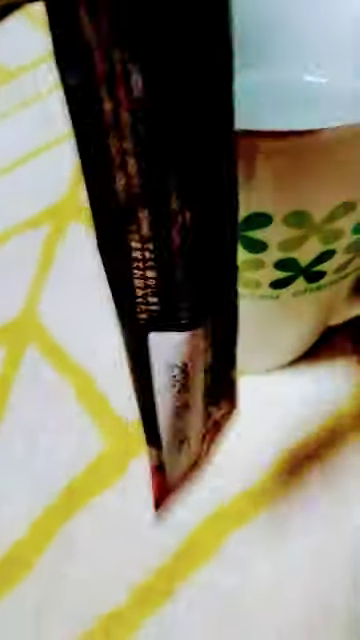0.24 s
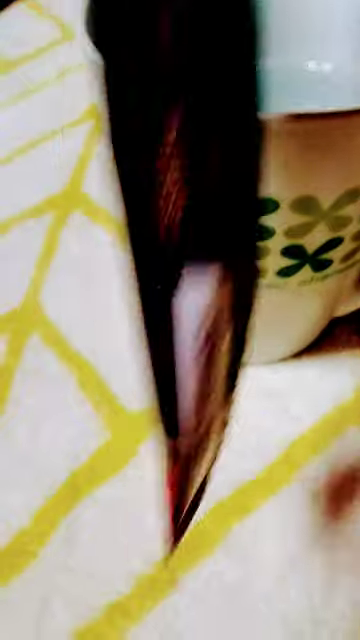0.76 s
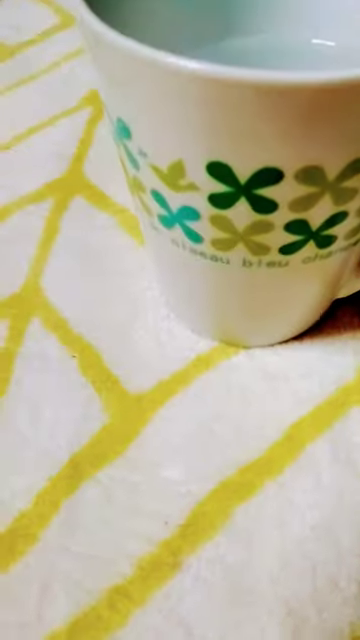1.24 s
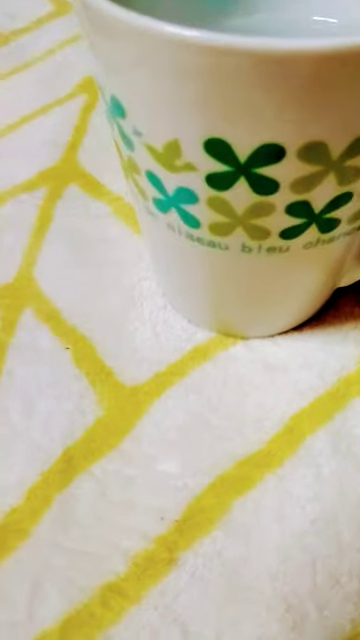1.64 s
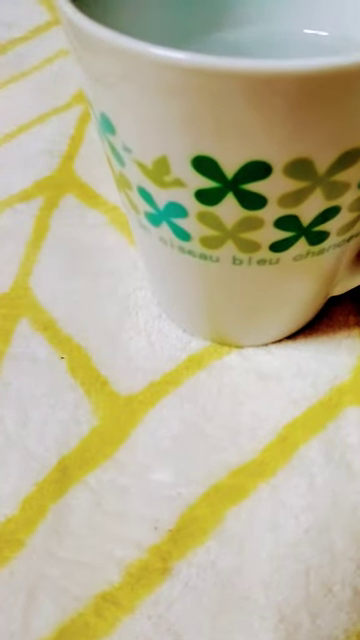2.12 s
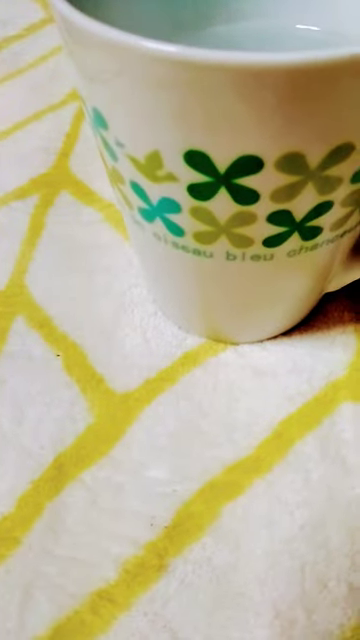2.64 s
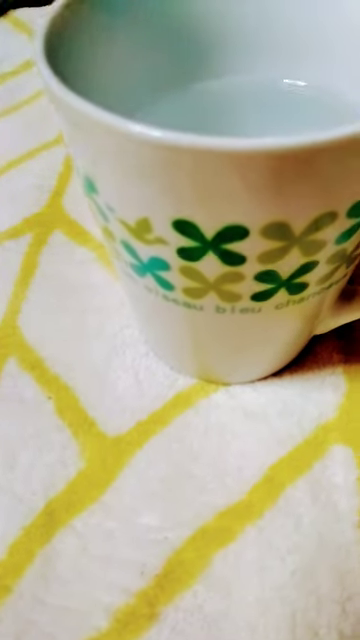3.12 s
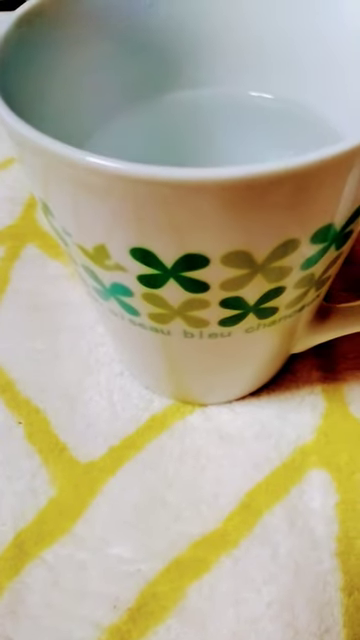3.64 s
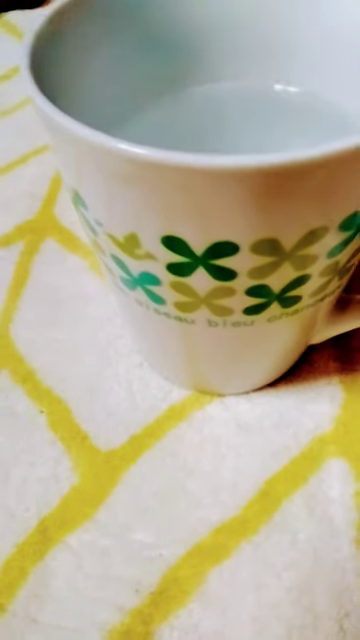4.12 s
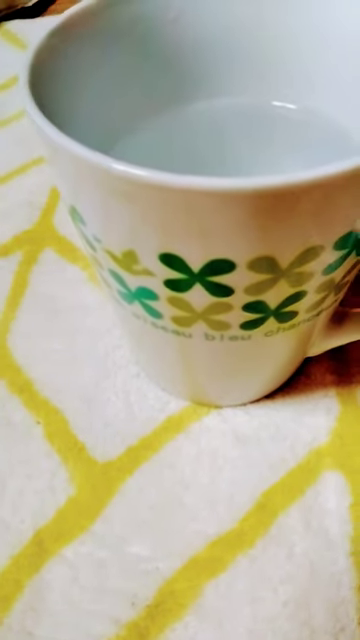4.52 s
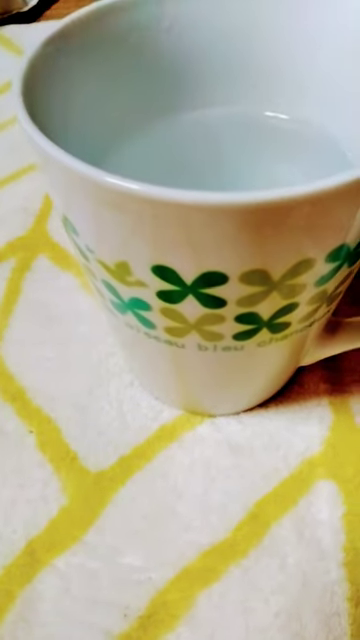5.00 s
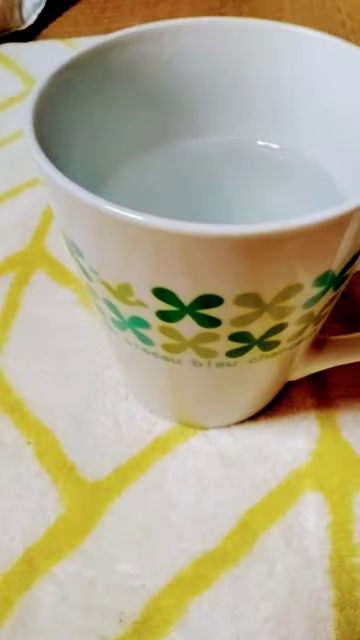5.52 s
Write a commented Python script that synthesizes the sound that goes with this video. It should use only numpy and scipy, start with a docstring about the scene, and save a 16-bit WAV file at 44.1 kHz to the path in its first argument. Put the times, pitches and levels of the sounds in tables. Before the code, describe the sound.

A small foil sachet is crinkled between fingers very close up, with sharp bright snaps, dry rustling and tearing bursts in a quiet room.

```python
"""Foil sachet crinkled and torn

Fingers crinkle and tear a small foil sachet close to two hand-held microphones in a quiet room.
Creases snap as shaped noise bursts with a ringing facet; rustle is a dense train of tiny slips over a rub.
Soft low pushes of air and hand are decaying sines; room hum and hiss are shaped noise.
The foil gets close echoes and a short tail, then a colour per microphone; the right one hears it later."""
import sys
import numpy as np
from scipy import signal
from scipy.fft import rfft, irfft
from scipy.io import wavfile
from scipy.ndimage import uniform_filter1d, map_coordinates

SR = 44100
rng = np.random.default_rng(int(sys.argv[2]) if len(sys.argv) > 2 else 0)


def generate_wav(sig):
    """Save sig (samples, or channels by samples) to the path in sys.argv[1] as 16-bit PCM at SR."""
    pcm = np.round(np.clip(np.atleast_2d(sig).T, -1, 1) * 32767).astype(np.int16)
    wavfile.write(sys.argv[1], SR, pcm)


N = 253839

# loudest buckling creases: start_s [s], treble_db [dB, energy at the foil], mid_over_treble_db [dB],
# ring_hz [Hz], bass_over_treble_db [dB], left_over_right_db [dB]
CREASES = [(0.068, -36.5, 18.5, 1340, 32, -4), (0.0914, -14, 5, 3770, 3, -1.5),
           (0.1515, 2.2, 1, 3260, 5, 0.5), (0.1833, -23.5, 19.5, 3430, 15, 8),
           (0.2095, -23, -15, 2410, -14, 9), (0.2558, -19, 12.5, 3400, 24.5, 1.5),
           (0.3183, -15, 12, 3240, 5.5, -1), (0.4328, -22.5, 0, 2410, 16, 1),
           (0.469, 6.5, -4, 4180, 0.5, -3.5), (0.4924, -38, 20, 1760, 20, 17),
           (0.5145, -4, 2, 4360, -5.7, -4), (0.528, -20.5, 15, 3160, 24.5, 8.5),
           (0.54, -12, 9.5, 5960, -10, 2), (0.605, -12.5, -1, 3940, -6, -1),
           (0.6265, 7.5, -4, 4360, -1, -3.5), (0.6992, -11.5, 2, 2680, -5, 1),
           (0.7043, -1.5, 3, 2830, -30, 5.5), (0.7488, -11.5, 12.5, 4330, -12, -4.5),
           (0.7994, -17.5, -1, 4200, -20, -6), (0.8467, -25, 7.5, 1340, 10, -1),
           (0.869, -16.5, 1, 1200, 13.5, -2), (0.9079, -13, -1.5, 1930, 14, -7.5),
           (0.918, -27.5, 13.5, 1220, 29, 0.5), (0.9733, 6.2, -5, 5560, 2, -7),
           (1.009, -31, 13, 1110, 31, -9), (1.026, -37, 26, 2160, 31, 9), (1.0382, -30.5, 26, 1960, 34, -4),
           (1.0824, -1.3, 6, 2430, -3, 1), (1.135, 8, -5, 2710, -1, 3), (1.168, -21.4, 5, 1770, -6, -3),
           (1.1953, -20.5, 9, 1600, 5, 3), (1.213, -37, 21, 1850, 20, -6), (1.3204, 9, 0, 2470, -9, 0),
           (1.4198, -12.5, -2.5, 5770, 0, -5), (1.45, -16.5, 6, 3640, 2, -2),
           (1.5037, -27.5, 13.5, 1230, 30, -9), (1.51, -36.5, 22, 1360, 28, -1),
           (1.5396, -16.5, 4.5, 3500, -13, -9), (1.554, -22, 11, 1460, 8, -7),
           (1.5856, 8.5, -4.2, 1530, 1.5, -4.5), (1.6, -8, 3, 6000, 12.5, -6),
           (1.6296, -8.5, -2, 4300, -4, 7), (1.638, 1.5, 0, 2400, 2.5, -6.5), (1.642, 4, -10, 2280, -8, 11),
           (1.7464, -34, 12, 1340, 23, -8), (1.7579, -20, 11.5, 2060, 8, -17.5),
           (1.795, -29, 15, 1960, 20, -19), (1.811, -8, 1, 5150, 2, -5.5),
           (1.8501, -16.5, 4, 2120, 22, -14), (1.8893, -38.5, 20.5, 1540, 21, -11),
           (1.9024, -18.5, -11, 4780, -10, -11), (1.917, -25, -13, 1720, -5, -13),
           (1.9952, -18.5, 7, 4940, 4, -11), (2.0774, -30, -11, 4610, 1, -6),
           (2.1752, -32.5, 17.5, 1250, 42.5, -11.5), (2.2568, -30.5, 9, 1630, 0, -10),
           (2.269, -17, 3.5, 1510, 15, -9), (2.2805, -23.5, 9, 1660, 10, -14),
           (2.318, -19, -36, 5430, -18.9, -17), (2.324, -25, -25, 1450, 0, -15),
           (2.355, -30.5, 4, 2100, 10, -21), (2.3766, -27, -8, 5810, 0, -22),
           (2.4001, -23.5, -24, 5770, -14, -13), (2.4341, -24.5, 0.5, 1300, 18, -1),
           (2.46, -1, -7, 5200, -19, -13), (2.4918, 5.5, -3, 1570, 0, -4), (2.542, -17, 11, 2000, 15, -7),
           (2.5867, -27, -14, 1340, 11, -17), (2.6503, -9.5, 5, 2180, 2.5, -18),
           (2.694, -30.5, 22.5, 2180, 29, -12.5), (2.7193, -31, 14, 1300, 25, -2),
           (2.734, -16.5, -3, 4870, -14, -13), (2.8081, -11.5, 3, 4650, -14, -2.5),
           (2.862, -19, -28, 3230, -20, -18), (2.9658, -16.5, -23, 5400, -15, -16),
           (2.9807, -16, -4.5, 5730, -17, -8), (3.0058, -30.5, -2, 2180, 3, -15),
           (3.066, -25.5, 4, 1600, -6, 8), (3.1462, -36.8, -6, 5030, -4, -7),
           (3.1958, -32, 7.5, 2790, 2, -6), (3.2345, -29.5, -8, 1116, -8, -14),
           (3.2776, -44.5, 16.5, 1250, 16, -3), (3.349, -31, 7, 5210, 18, -19),
           (3.3574, -26, -2, 5800, -11, -7), (3.387, -15, -6.5, 3670, -21, -10),
           (3.3998, -14.5, -11, 5560, -17, -15), (3.4163, -18, 1, 5150, 1, -12.5),
           (3.461, -19.5, -6, 5990, -15, -18), (3.4677, -27, -8, 5990, -13, -15),
           (3.4791, -13, -4.5, 5460, -11, -3), (3.4878, -14, -15, 4090, -14.3, -13),
           (3.541, -31.5, -5, 3960, 2, -15), (3.582, -24, -34, 4650, -16, -13),
           (3.6058, -32, 23, 2520, 0, -12), (3.7924, -27, -18, 5770, -6, -15),
           (3.812, -16, -8, 1290, -20, -8), (3.82, -32, 17.5, 1930, 19, -21),
           (3.858, -11, 9, 2300, -6, -17), (3.9335, -0.5, -9.5, 5540, 4.5, -14.5),
           (3.9436, -7, -42, 5800, -20, -24), (3.954, -16.5, 14, 1770, 11.5, -11.5),
           (4.025, -24, -20, 5990, -2, -9), (4.2471, -34, 24, 2040, 32, -12.5),
           (4.257, -26.5, 12.5, 1510, 22.5, -17), (4.2757, -32, 16, 2060, 18, -15),
           (4.402, -12.5, -31, 5550, -5, -8), (4.4175, -6.5, -40, 4500, 1, -19.5),
           (4.7224, -36.5, 24.5, 1820, -2, -3), (4.7697, -22.5, 16, 1720, 15, -3),
           (4.784, -27, 24.5, 1730, 22, -2), (4.8411, -6, 8, 2570, 14.5, -3), (4.8814, -6, 3, 5930, 3, -5),
           (4.9251, 2.5, -5, 3960, -14, -6.5), (4.9466, -7.5, 6, 1300, 8, -5),
           (4.9729, 5.5, 1, 4330, -5, -2), (4.9921, -5, 4.5, 5730, -4, -2), (5.0062, -2, 3, 5700, 10.5, 14),
           (5.015, -6.5, -3.5, 2150, -10, -14), (5.053, -16.5, 5, 4800, -22, 4),
           (5.1022, -21, -6, 4770, -16, -11), (5.1607, -35, -12, 1210, 31, -13),
           (5.1972, -4, 2, 3220, -15, -4), (5.2183, -6, 7.5, 5000, -1, 3), (5.2269, 10, -10, 4870, -3.5, 0),
           (5.25, -15, -14, 1290, 8, 14), (5.294, -15.5, 13.5, 2730, 14.5, 1),
           (5.383, -6, -20, 5170, -2, 1), (5.4267, -10.5, 1.5, 1630, 20, 13),
           (5.4317, -13, 14, 3700, -12, -1), (5.4745, -8.5, -9, 2310, -22, -20),
           (5.511, -30, 1, 1160, 20, 12), (5.5293, -20, 3.5, 1110, 20.5, 18.5),
           (5.5426, -18, 8, 3790, -6, -15), (5.5664, 4.5, 1.5, 4300, 2.5, 8.5),
           (5.6971, -4, -39, 5940, -5, -17)]
SNAP_SCALE_MS, SNAP_SPREAD_DB = 1.033, 1.36
# dB of length per dB: stronger snaps are quicker, those heavy in mid are longer
LENGTH_PER_TREBLE_DB, LENGTH_PER_MID_DB = -0.09, 0.125


def snaps(rows):
    """Each crease gives a quick burst and a weaker flutter; the facet beside it rings; lower sound lasts longer."""
    start_s, treble_db, mid_db, ring_hz, bass_db, pan_db = np.transpose(rows)[..., None]
    length_db = LENGTH_PER_TREBLE_DB * treble_db + LENGTH_PER_MID_DB * mid_db
    length_db = length_db + SNAP_SPREAD_DB * rng.standard_normal(start_s.shape)
    scale_ms = SNAP_SCALE_MS * gain_of(length_db)
    size, lead = 1024, 256  # samples
    t_ms = (np.arange(size) - lead) * 1000 / SR

    hz = np.fft.rfftfreq(size, 1 / SR)
    half_width_hz = .13 * ring_hz
    resonance = 1 / (1 + 1j * (hz - ring_hz) / half_width_hz)
    ring = 0.65 / (1 + (hz / ring_hz / 2.2) ** 2) + resonance

    noise = two_views((len(start_s), size), 0.73)
    shove = 0.24 * np.sign(noise[0, :, :1])  # the facet also jumps as a whole, in or out
    burst = 0
    for k, (over_db, stretch) in enumerate(zip((0, mid_db, bass_db), (.3, .35, .6))):
        age = np.maximum(t_ms, 0) / (stretch * np.maximum(scale_ms, .2))
        quick = age ** 2 * np.exp(-2.2 * age)
        flutter = 0.19 * np.minimum(age, 1) * np.exp(-.3 * age)
        band = bands((noise + shove * k / 2) * (quick + flutter), ring)[k]
        burst = burst + band * gain_of(treble_db + over_db) / np.sqrt(size)
    burst = patchy(burst, 2.6) * panned(pan_db)

    out = np.zeros((2, N))
    for k in range(len(start_s)):
        add(out, start_s[k, 0] - lead / SR, burst[:, k])
    return out


TICKS_PER_S = 16
TICK_OVER_RUSTLE_DB, TICK_SPREAD_DB = 18, 3
TICK_MID_DB, TICK_BASS_DB, TICK_COLOUR_SPREAD_DB = 0, 8, 6.5


def ticks(level_db):
    """Small creases at random moments, as strong as the rustle around them allows; rows as in CREASES."""
    when, pitch = rng.random((round(TICKS_PER_S * N / SR), 2)).T
    size, mid, bass, side = rng.standard_normal((len(when), 4)).T
    at = np.int_(when * (N - 1))
    treble_db = level_db[at] + TICK_OVER_RUSTLE_DB + TICK_SPREAD_DB * size
    mid_db = TICK_MID_DB + TICK_COLOUR_SPREAD_DB * mid
    bass_db = TICK_BASS_DB + TICK_COLOUR_SPREAD_DB * bass
    ring_hz = 1100 * 5.5 ** pitch
    pan_db = along(PLACE)[at] + 4 * side
    return np.transpose([at / SR, treble_db, mid_db, ring_hz, bass_db, pan_db])


# grip and work of the fingers: time_s [s], treble_db [dB]
GRIP = [(0, -51), (0.09, -66), (0.3, -102), (0.5, -80), (0.56, -51), (0.79, -61), (0.82, -82), (0.95, -74),
        (1.05, -66), (1.2, -56), (1.28, -62), (1.39, -47), (1.65, -50.5), (1.95, -61.5), (2.1, -78),
        (2.29, -57), (2.69, -54.5), (2.98, -59.5), (3.07, -70.5), (3.26, -82), (3.42, -59), (3.56, -69.5),
        (3.69, -60.5), (3.73, -55), (3.9, -61.5), (4.0, -59), (4.125, -57.5), (4.15, -74.5), (4.34, -58),
        (4.63, -54.5), (4.9, -54), (5.09, -53.5), (5.21, -46), (5.25, -43.5), (5.45, -39), (5.5, -59),
        (5.76, -67)]
# where the sachet is held: time_s [s], left_over_right_db [dB]
PLACE = [(0, -2), (1.3, 0), (1.9, -6.5), (2.5, -5.5), (3.1, -7), (4.1, -12.5), (4.5, -2.5), (5.2, -2),
         (5.45, -3.5), (5.6, -6), (5.76, -11)]
# short slides of a finger or of the tear: loudest_s [s], treble_db [dB], length_s [s],
# pan_off_place_db [dB, left over right], dull_db [dB, added to mid and bass over treble]
STROKES = [(0.008, -40, 0.022, -7, 14.5), (0.039, -40.5, 0.034, 1, 4), (0.18, -44.5, .08, -12, 6.5),
           (0.425, -52, 0.14, -3, -3), (0.571, -44, 0.15, 0, -4.5), (0.653, -54, 0.067, -5, -9),
           (0.891, -42, .11, -1, 0), (1.006, -45.5, 0.089, -6, 13), (1.166, -49.5, 0.18, -4, 11),
           (1.234, -33.5, 0.042, 4, 0.5), (1.347, -45.5, 0.16, -12, 5.5), (2.008, -53.5, 0.15, -4, -1),
           (2.431, -40.5, .12, -1, -6), (2.525, -51, 0.09, 17, 9), (2.735, -41, 0.11, 0, 2.5),
           (2.797, -43, 0.13, -0.5, 7.5), (2.907, -50, 0.044, -6, -10), (3.806, -40, 0.04, -2, -6),
           (3.85, -42, 0.031, 6, -7), (3.947, -26.5, 0.042, 13, 3.5), (4.264, -49.5, 0.2, 0, 1.5),
           (4.391, -40.5, 0.16, -0.5, -2), (4.479, -42, 0.43, -0.5, 0.5), (4.93, -47, .05, 6, -26),
           (5.037, -49, 0.24, -20, -3), (5.426, -36.5, 0.1, 3, 11), (5.54, -41.5, 0.077, 6, 13),
           (5.568, -25, 0.11, -7, -0.5), (5.64, -30.5, 0.062, 1.5, 4), (5.7, -29.5, 0.027, 2, 0)]
STROKE_RISE_SHARE, STROKE_END_DB, STROKE_ROUND = 0.51, -30.5, 1.29  # rise share of length, level at its ends
SETTLE_DB, SETTLE_RISE_S, SETTLE_T60_S = -47.5, 0.0027, 0.18  # level is relative to the snap


def working():
    """Powers of grip, slides and settling after listed snaps add up; returns rustle treble, pan and dullness in dB."""
    t, kicks = np.arange(N) / SR, np.zeros(N)
    for start_s, treble_db, *_ in CREASES:
        kicks[round(start_s * SR)] = gain_of(2 * (treble_db + SETTLE_DB))
    age_s = t[:SR // 4]
    settling = np.minimum(age_s / SETTLE_RISE_S, 1) * gain_of(-120 * age_s / SETTLE_T60_S)
    settled = abs(signal.fftconvolve(kicks, settling)[:N])

    power, aside, duller = gain_of(2 * along(GRIP)) + settled, 0, 0
    for loudest_s, treble_db, length_s, pan_db, dull_db in STROKES:
        before = (loudest_s - t) / STROKE_RISE_SHARE
        after = (t - loudest_s) / (1 - STROKE_RISE_SHARE)
        away = np.maximum(before, after) / length_s
        slide = gain_of(2 * (treble_db + STROKE_END_DB * away ** STROKE_ROUND))
        power = power + slide
        aside = aside + slide * pan_db
        duller = duller + slide * dull_db
    return 10 * np.log10(power), along(PLACE) + aside / power, duller / power


# harder rustle is brighter: mid and bass over treble at MEDIUM_DB, and change per dB
MEDIUM_DB = -55
RUSTLE_MID_DB, MID_PER_DB, RUSTLE_BASS_DB, BASS_PER_DB = 2, -0.42, 3.5, -0.287
SLIPS_PER_S = 500  # in each of the shared and own trains
RUB_SHARE = 1.2  # multiple of the smallest slip


def slips(spread_db):
    """Impulses at random moments; exponential sizes in dB make a few of them large."""
    size = gain_of(spread_db * np.minimum(rng.exponential(1, N), 5))
    return size * (rng.random(N) < SLIPS_PER_S / SR)


def rustle(treble_db, pan_db, dull_db):
    """Countless tiny slips and creases over a smooth rub; a few are large, and they come in clumps."""
    harder_db = treble_db - MEDIUM_DB
    mid_db = RUSTLE_MID_DB + MID_PER_DB * harder_db + dull_db
    bass_db = RUSTLE_BASS_DB + BASS_PER_DB * harder_db + dull_db
    noise = two_views((N,), 0.33)
    shared = slips(2.6)
    parts = []
    for k, decay_ms in enumerate((.5, .8, 1.5)):
        decay = np.exp(-1000 / (decay_ms * SR))
        grain = signal.lfilter([1], [1, -decay], shared + slips(2.4)) + RUB_SHARE
        wander = uniform_filter1d(uniform_filter1d(rng.standard_normal(N), 400), 400)
        envelope = grain * gain_of(2.1 * evened(wander))
        slow = np.sqrt(uniform_filter1d(envelope ** 2, 3000))  # levelled, so treble_db sets the loudness
        parts.append(bands(noise * envelope / slow)[k])
    treble, mid, bass = parts
    treble, mid = patchy(treble, 3.5), patchy(mid, 2.4)
    mixed = treble + gain_of(mid_db) * mid + gain_of(bass_db) * bass
    return mixed * gain_of(treble_db) * panned(pan_db)


# soft low pushes of air and hand: start_s [s], level_db [dB, before envelope and leak], pitch_hz [Hz],
# left_over_right_db [dB], decay_swings [cycles]
PUSHES = [(1.135, -29, 202, 23, 0.13), (1.349, -46, 199, -3, 1.5), (2.72, -37, 225, -4, 1.4),
          (3.936, -36.5, 262, -1, 1.16), (5.0065, -21, 184, 44.5, 0.12), (5.227, -53, 310, 17, 1.5),
          (5.425, -41.5, 195, 27, 1.7), (5.528, -48, 170, 5, 4.2)]


def pushes():
    """A dull knock with a soft start; with less than one swing it is a puff of pressure."""
    out = np.zeros((2, N))
    for start_s, level_db, pitch_hz, pan_db, swings in PUSHES:
        turns = np.arange(3000) / SR * pitch_hz
        rise = np.minimum(turns / swings ** 2 / 0.2, 1)
        knock = np.sin(2 * np.pi * turns) * rise * np.exp(-turns / swings * 1.7)
        # pressure leaks away: high-pass at 60 Hz
        knock = signal.lfilter([1, -1], [1, -np.exp(-2 * np.pi * 60 / SR)], knock)
        add(out, start_s, gain_of(level_db) * panned(pan_db)[:, None] * knock)
    return out


# reflections off table top, cup and hands: delay_ms [ms, varied by 10 %], level_db [dB]
ECHOES = [(1.1, -42.5), (2.8, -16.5), (5, -31)]
TAIL_DB, TAIL_T60_S = -18.5, 0.098


def nearby(x):
    """A few close reflections and a short, weak room tail, different at each microphone."""
    t = np.arange(SR // 5) / SR
    tail = rng.standard_normal((2, len(t))) * gain_of(-60 * t / TAIL_T60_S) * (t > .003)
    taps = gain_of(TAIL_DB) * tail / np.linalg.norm(tail, axis=1, keepdims=True)
    taps[:, 0] = 1
    for delay_ms, level_db in ECHOES:
        at = np.int_(delay_ms * rng.uniform(.9, 1.1, 2) * SR / 1000)
        taps[[0, 1], at] += gain_of(level_db)
    return signal.fftconvolve(x, taps, axes=1)[:, :N]


# colour of each microphone port, and the steep end of the treble above 15.7 kHz: pitch_hz [Hz], level_db [dB]
LEFT_PORT = [(60, -1), (150, -11), (500, -1), (900, 1.5), (4800, -1.5), (5500, 4), (7500, -1), (8300, 6.5),
             (10000, -9), (10500, 1), (12800, 0), (14000, 2), (15200, -11.5), (15700, -15), (17000, -30)]
RIGHT_PORT = [(60, -17.5), (300, -12.5), (1100, -9), (1700, -6.5), (2600, -3.5), (4500, -1.5), (5300, 3.5),
              (5800, 0), (7000, 8), (7800, 7.5), (8800, 16), (9600, 11.5), (10200, 3.5), (12500, -5.5),
              (14500, -6), (15200, -4.5), (15700, -15), (17000, -46)]
# the further left the sachet, the later the right microphone hears it
RIGHT_LAG_MS, LAG_MS_PER_DB = .5, .018


def ports(x):
    """Each port colours its microphone, ringing at its resonances; the right one hears the sachet later."""
    lag = (RIGHT_LAG_MS + LAG_MS_PER_DB * along(PLACE)) * SR / 1000
    late = map_coordinates(x[1], [np.arange(N) - lag], order=5, mode="nearest")
    responses = [causal(LEFT_PORT), causal(RIGHT_PORT)]
    return signal.oaconvolve([x[0], late], responses, axes=1)[:, :N]


# room spectrum: pitch_hz [Hz], density_db [dB per Hz, relative]
ROOM_SPECTRUM = [(18, 7), (33, -31), (60, -2), (86, 5.5), (125, 5), (300, -2.5), (1040, -17.5), (2840, -21),
                 (3720, -27), (7110, -26.5), (9320, -19.5), (15300, -19), (15900, -27.5)]
# left-right likeness of the room: pitch_hz [Hz], likeness [0..1]
ROOM_LIKENESS = [(60, 0.71), (240, 0.75), (950, 0.0), (3770, 0.45), (15000, 0.48)]
# side of the room tone: pitch_hz [Hz], left_over_right_db [dB]
ROOM_PAN = [(60, -2.5), (240, -4.5), (950, -18.5), (3770, 9), (15000, -24.5)]
ROOM_TONE_DB = -71  # rms of the mean of both channels


def room_tone():
    """A low wavering hum of the building over microphone hiss, made as spectral frames of noise."""
    frames, hz = N // 1024 + 5, np.fft.rfftfreq(4096, 1 / SR)
    a, b, c, d, patches = rng.standard_normal((frames, 2049, 5)).T
    patches_db = evened(uniform_filter1d(uniform_filter1d(patches, 20, 0), 4, 1))
    same = np.clip(read(ROOM_LIKENESS, hz), -1, 1)[:, None]
    left = a + 1j * b
    right = same * left + np.sqrt(1 - same ** 2) * (c + 1j * d)
    level = gain_of(read(ROOM_SPECTRUM, hz)[:, None] + patches_db)
    z = np.array([left, right]) * level * panned(read(ROOM_PAN, hz))[..., None]
    sound = signal.istft(z, nperseg=4096, noverlap=3072)[1][:, :N]
    return gain_of(ROOM_TONE_DB) * sound / sound.mean(0).std()


def patchy(x, spread_db):
    """The crumpled foil favours other pitches from moment to moment, a little differently for each microphone."""
    z = signal.stft(x, nperseg=256)[2]
    field = two_views(z.shape[1:], 0.94)
    field = evened(uniform_filter1d(uniform_filter1d(field, 7, -2), 8, -1))
    shaped = signal.istft(z * gain_of(spread_db * field), nperseg=256)[1][..., :x.shape[-1]]
    keep_level = np.linalg.norm(x, axis=-1, keepdims=True) / np.linalg.norm(shaped, axis=-1, keepdims=True)
    return shaped * keep_level


# band centres: bass_hz, mid_hz, treble_hz [Hz]
BAND_HZ = (353, 2620, 13430)


def bands(x, ring=1):
    """Splits x into treble, mid and bass, each levelled to its share of white noise of power 1; ring colours mid."""
    hz = np.fft.rfftfreq(x.shape[-1], 1 / SR)
    bass, mid, treble = np.array([read(list(zip(BAND_HZ, row)), hz) for row in np.eye(3)]) ** 2
    bass = bass * (hz / (hz + 200)) ** 2
    out = []
    for share, colour in ((treble, 1), (mid, ring), (bass, 1)):
        band = irfft(rfft(x) * share * colour, x.shape[-1])
        out.append(evened(band, axis=-1) * np.sqrt(np.mean(share ** 2)))
    return out


def two_views(shape, same):
    """Noise as two microphones meet it: a common part and a part of their own."""
    common, own = rng.standard_normal(shape), rng.standard_normal((*shape, 2))
    same = np.clip(same, 0, 1)
    return same * common + np.sqrt(1 - same ** 2) * np.moveaxis(own, -1, 0)


def causal(points):
    """Minimum-phase impulse response with this spectrum: it rings only after the blow."""
    log_level = np.log(gain_of(read(points, abs(np.fft.fftfreq(4096, 1 / SR)))))
    return np.fft.ifft(np.exp(np.conj(signal.hilbert(log_level)))).real[:1024]


def gain_of(db):
    """Amplitude factor of a level in dB."""
    return 10 ** (np.asarray(db) / 20)


def panned(db):
    """Left and right gains, half of the dB difference each."""
    return gain_of(np.multiply.outer([.5, -.5], db))


def evened(x, axis=None):
    """Scales x to rms 1."""
    return x / np.sqrt(np.mean(x ** 2, axis=axis, keepdims=True) + 1e-20)


def read(points, hz):
    """Reads a curve over log frequency."""
    f, value = np.transpose(points)
    return np.interp(np.log(hz + 1), np.log(f + 1), value)


def along(curve):
    """Reads a curve over time, one value per sample."""
    time_s, value = np.transpose(curve)
    return np.interp(np.arange(N) / SR, time_s, value)


def add(mix, start_s, sound):
    """Adds sound into mix at start_s, cut at the end."""
    part = mix[:, max(round(start_s * SR), 0):][:, :sound.shape[1]]
    part += sound[:, :part.shape[1]]


def scene():
    """Foil passes echoes and ports; pushes and room tone are added after them."""
    level_db, pan_db, dull_db = working()
    creases = snaps(np.vstack([CREASES, ticks(level_db)]))
    foil = creases + rustle(level_db, pan_db, dull_db)
    return ports(nearby(foil)) + pushes() + room_tone()


EDGE_HZ = 16800


def record(dry):
    """The loudest snaps are rounded a little; band limit; a slight constant offset of the converter."""
    rounded = .9 * np.tanh(dry / .9)
    lowpass = signal.firwin(511, EDGE_HZ, window=("kaiser", 9), fs=SR)
    return signal.oaconvolve(rounded, lowpass[None], "same") + 0.0003


dry = scene()
out = record(dry)
generate_wav(out)
```